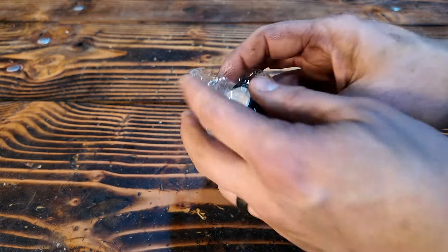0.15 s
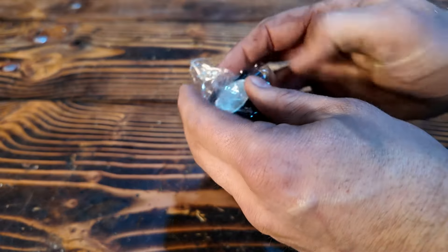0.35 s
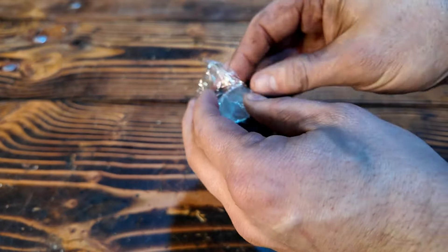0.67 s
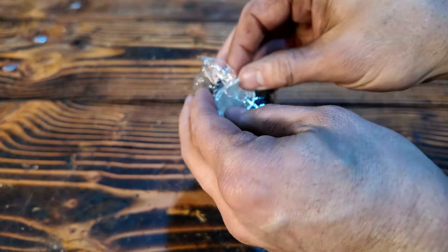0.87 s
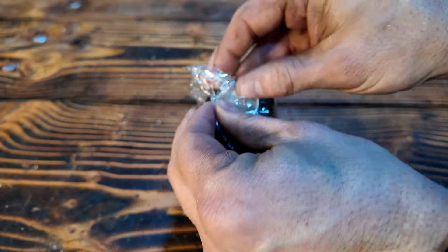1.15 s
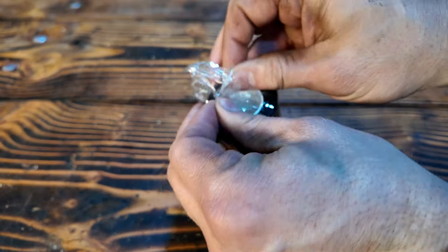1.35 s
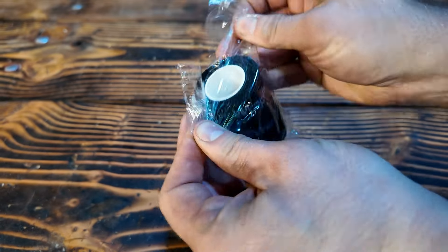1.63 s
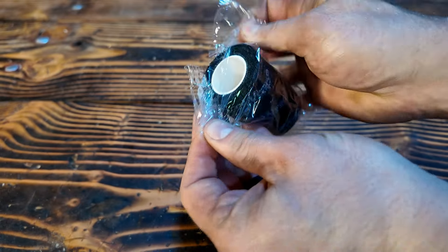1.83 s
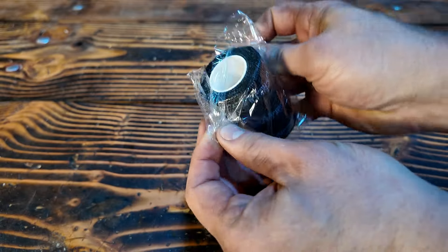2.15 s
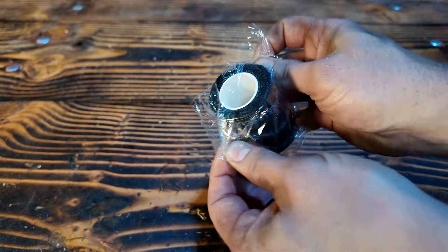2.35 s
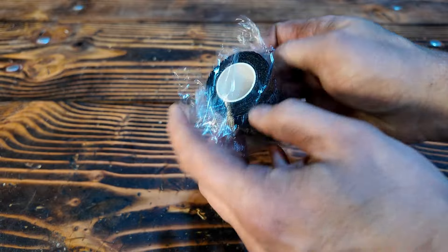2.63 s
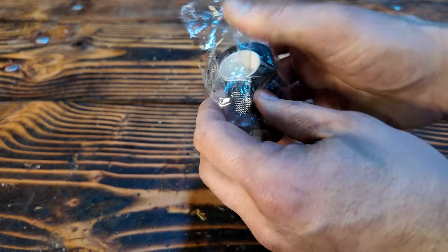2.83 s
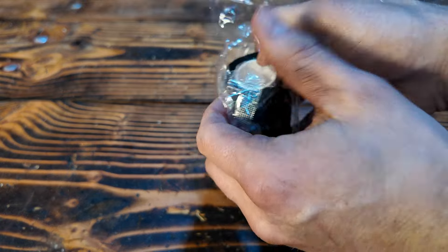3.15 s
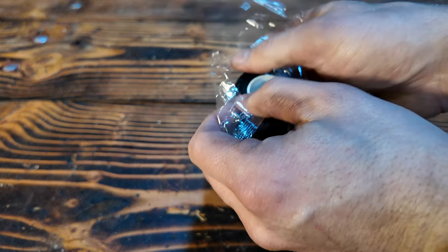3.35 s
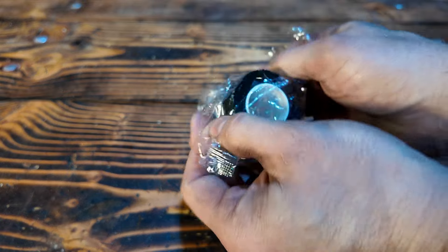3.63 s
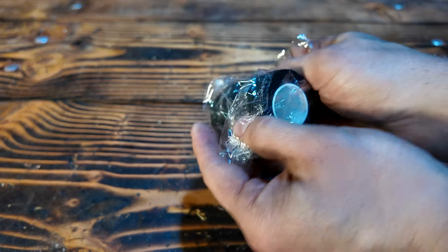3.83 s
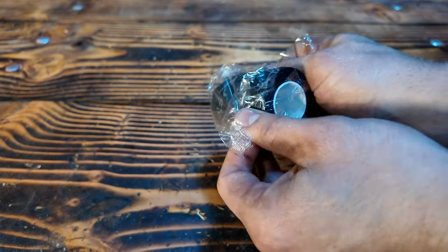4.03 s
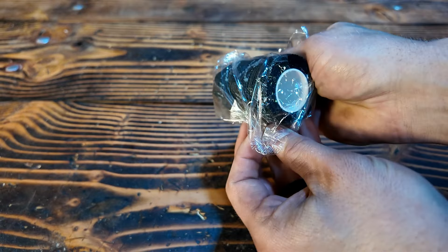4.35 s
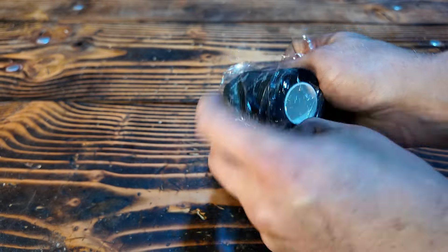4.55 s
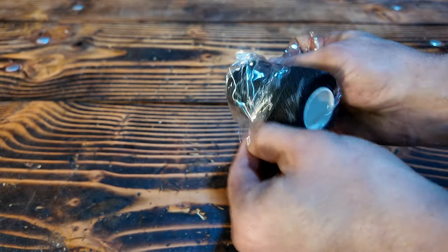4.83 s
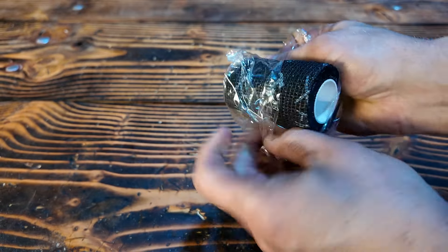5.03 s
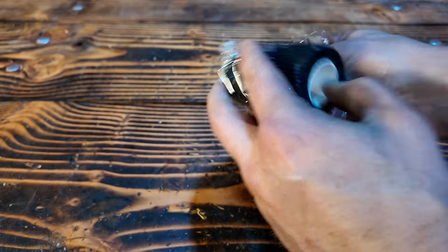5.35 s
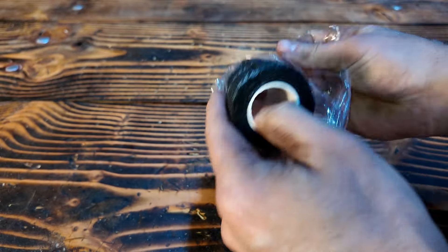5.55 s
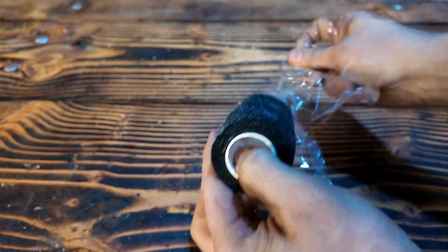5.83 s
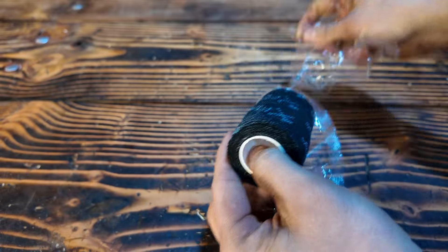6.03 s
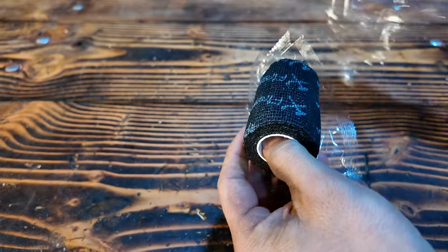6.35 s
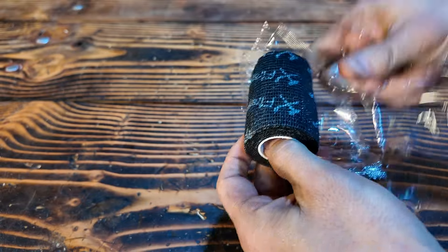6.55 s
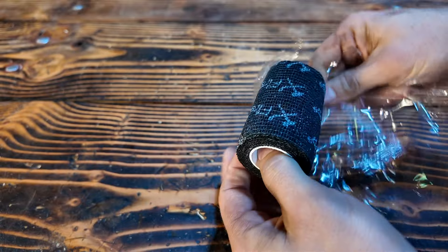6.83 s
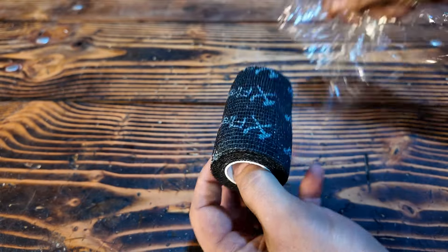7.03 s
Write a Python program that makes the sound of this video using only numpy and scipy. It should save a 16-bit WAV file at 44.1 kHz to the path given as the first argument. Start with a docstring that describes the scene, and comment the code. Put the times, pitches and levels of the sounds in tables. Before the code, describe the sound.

Bright, dry cellophane noise dominates: millisecond snaps, fine creases ticking and smooth film-on-film rustle, arriving in uneven clumps as fingers tug. Soft, hollow rubbing on the roll accompanies some pulls. Activity peaks briefly early on, continues in small bursts, swells again late, then thins out. It is heard close by in stereo, with very short indoor reflections and a faint low rumble, mains hum and hiss.

```python
"""In a quiet room, over a wooden table, hands peel and crumple a thin plastic wrapper.
Creases buckle with millisecond snaps, each ringing a facet of its own, in clumps as the fingers pull.
Film sliding on film adds a smooth rustle coloured by an air pocket; fingers rub the roll as filtered noise.
Short feedback delays answer as the room; filtered noise and a wavering sine give a low ventilation
rumble, a thin hiss and a mains hum beneath."""
import sys
import numpy as np
from scipy import signal
from scipy.fft import rfft, irfft
from scipy.io import wavfile
from scipy.ndimage import uniform_filter1d

SR = 44100
rng = np.random.default_rng(int(sys.argv[2]) if len(sys.argv) > 2 else 0)


def waveform_to_disk(signal):
    """Save audio, clipped to [-1, 1], as 16-bit WAV at the path in sys.argv[1]."""
    frames = np.transpose(np.atleast_2d(signal))
    scaled = np.clip(frames, -1, 1) * 32767
    samples = np.round(scaled).astype(np.int16)
    wavfile.write(sys.argv[1], SR, samples)


def how_loud(loudness_db):
    """Turn decibels into a plain amplitude multiplier (0 dB gives 1, 20 dB gives 10)."""
    steps = np.asarray(loudness_db, float) / 20
    return 10 ** steps


N = 316715


def rms_one(x):
    """Normalization: scales a signal to unit root mean square."""
    return x / np.sqrt(np.mean(x ** 2) + 1e-20)


def in_time(rows):
    """Linear interpolation: draws each column after t/s as a curve over all samples."""
    s, *columns = np.transpose(rows)
    return [np.interp(np.arange(N) / SR, s, column) for column in columns]


def coloured(x, points):
    """Spectral shaping: applies gain/dB by f/Hz, linear between points on a log frequency axis."""
    f, gain_db = np.transpose(points)
    hz = np.maximum(np.arange(N // 2 + 1) * SR / N, 1)
    gain = how_loud(np.interp(np.log(hz), np.log(f), gain_db))
    return irfft(rfft(x) * gain, N)


def drift(rate_hz):
    """Low-passed chance: noise through a double pole at rate_hz, of unit rms."""
    r = np.exp(-40 * np.pi * rate_hz / SR)   # computed on every 20th sample
    noise = rng.standard_normal(N // 20 + 2002)
    slow = signal.lfilter([1], [1, -2 * r, r * r], noise)[2000:]
    return np.interp(np.arange(N) / 20, np.arange(len(slow)), rms_one(slow - slow.mean()))


def ring(x, hz, t60):
    """Damped resonance: a two-pole mode that a unit click sets ringing near height 1."""
    r = how_loud(-60 / (t60 * SR))
    w = 2 * np.pi * min(hz, .45 * SR) / SR
    return signal.lfilter([np.sin(w)], [1, -2 * r * np.cos(w), r * r], x + 1e-18)


def dying(clicks, tau_s):
    """Exponential decay: an envelope that jumps at each click and dies away."""
    return signal.lfilter([1], [1, -np.exp(-1 / (tau_s * SR))], clicks)


def small(x, hz):
    """Radiation efficiency: small facets radiate little below their own range."""
    return signal.sosfilt(signal.butter(2, hz, "high", fs=SR, output="sos"), x)


def near_pocket(hz, pocket_hz):
    """Resonant selection: air between film, roll and hands favours folds near its pitch."""
    width_octaves = .25
    return np.exp(-.5 * (np.log2(hz / pocket_hz) / width_octaves) ** 2)


def gestures(rows, rise_db_per_s, fall_db_per_s):
    """Power envelope: each gesture rises, holds for its length and falls, on every 40th sample."""
    start, length, level_db = np.transpose(rows)[:3, :, None]
    t = np.arange(0, N + 40, 40) / SR
    before = np.maximum(start - t, 0)
    after = np.maximum(t - start - length, 0)
    return how_loud(level_db - rise_db_per_s * before - fall_db_per_s * after) ** 2


def unfold(coarse):
    """Linear interpolation: from every 40th sample to every sample."""
    return np.interp(np.arange(N) / 40, np.arange(len(coarse)), coarse)


# Facet sizes: lowest f/Hz, highest f/Hz, buckles/s before clumping, cycles of ring to -60 dB,
# size spread/dB per unit of an exponential draw
LARGE_FOLDS = (777, 2760, 350, 8.7, 6.6)
MIDDLE_FACETS = (2970, 5410, 650, 7.3, 3.4)
FINE_CREASES = (6830, 17600, 600, 1.96, 2.8)
# Fine creases: t/s, level/dB over the crackle
FINE_LEVEL = [(0.0, 4), (0.8, 2), (1.3, 3.5), (1.6, 1.5), (2.2, 1), (2.6, 1), (3.3, 2), (4.0, 3.5),
              (4.9, 3), (5.15, 3), (5.7, 2.5), (6.2, -3), (6.7, 0.5), (6.93, -1.5), (7.02, 3), (7.18, 0)]
# How the film radiates over the table: f/Hz, gain/dB
FILM_RADIATION = [(500, -1.5), (900, -1), (1500, -4.5), (2200, -2.5), (2900, -4), (3700, -1), (5000, -0.5),
                  (6500, 0), (10000, 1), (15000, -4)]


def film_sound():
    """Superposition: snaps, rustle and three sizes of crackle radiate from one film, as (mid, side)."""
    crackle_db, large_db, pocket_hz = handling()
    fine_db, = in_time(FINE_LEVEL)
    shared = rng.random(N), np.minimum(rng.exponential(1, N), 4.0)
    # a harder pull buckles more creases, more evenly
    effort = np.clip((crackle_db + 48) / 22, 0, 1)
    unevenness_db = 4.8 * drift(25) + 4.3 * drift(90)
    clumps = how_loud(-4.0 + 17.0 * effort + (1 - 0.79 * effort) * unevenness_db)
    middle = crackle(MIDDLE_FACETS, shared, clumps, pocket_hz)
    large = how_loud(large_db) * crackle(LARGE_FOLDS, shared, clumps, pocket_hz)
    fine = how_loud(fine_db) * crackle(FINE_CREASES, shared, clumps, pocket_hz)
    rustle = slide(crackle_db + 0.33 * large_db, effort, pocket_hz)
    film = snaps(pocket_hz) + rustle + how_loud(crackle_db) * (middle + large + fine)
    no_bass = signal.butter(4, 560, "high", fs=SR, output="sos")   # small facets radiate no bass
    return signal.sosfilt(no_bass, coloured(film, FILM_RADIATION))


# Tugs of the fingers on the film: start t/s, length t/s, crackle level/dB,
# large folds level/dB over the crackle, air pocket f/Hz
TUGS = [(0.0, 0.016, -44, 4.5, 1500), (0.102, 0.014, -38.5, 3.5, 1370), (0.245, 0.026, -36.5, 0, 1980),
        (0.303, 0.047, -38, -16, 2200), (0.43, 0.078, -42.5, -2, 1980), (0.578, 0.089, -39, 1.5, 1160),
        (0.707, 0.022, -44.5, -2, 1300), (0.735, 0.041, -50, -4, 1500), (0.812, 0.07, -46.5, 2.5, 1510),
        (0.946, 0.12, -45, -2.5, 2180), (1.082, 0.065, -37.5, 2, 2000), (1.191, 0.054, -42.5, 3, 1660),
        (1.271, 0.087, -40.5, 4, 1670), (1.46, 0.062, -25.5, -5.5, 1950), (1.56, 0.032, -40, -17, 900),
        (1.6, .03, -33.5, -23, 1200), (1.63, 0.042, -28.5, -10.5, 860), (1.706, 0.03, -39, -10, 900),
        (1.771, 0.021, -37, -4.5, 1490), (1.826, 0.066, -38, 0.5, 2010), (1.94, 0.05, -37.5, -2.5, 1840),
        (2.024, 0.064, -36.5, -3.5, 1900), (2.126, .08, -38.5, -4.5, 1790), (2.222, 0.04, -35.5, 1, 1770),
        (2.341, .054, -41, -24, 1800), (2.402, 0.0086, -42.5, 1, 2250), (2.472, 0.12, -38, -4, 2080),
        (2.544, 0.1, -40, -9, 1760), (2.713, 0.059, -35.5, -9, 1890), (2.768, 0.17, -42, -1, 1740),
        (2.981, .11, -38, -8.5, 1620), (3.088, 0.095, -39.5, -12, 2100), (3.323, 0.12, -40.5, -6.5, 1660),
        (3.472, 0.072, -40, -5, 1680), (3.581, 0.087, -36.5, -8, 1250), (3.815, 0.17, -38.5, -2, 1720),
        (4.032, 0.092, -33.5, -8, 1630), (4.157, 0.099, -34, -1, 1850), (4.281, 0.2, -38.5, -7.5, 2200),
        (4.491, 0.16, -36.5, -6, 2200), (4.693, 0.18, -34, -5.5, 1780), (4.89, 0.071, -37, -2.5, 1850),
        (5.113, 0.069, -34, -4, 2020), (5.246, 0.061, -36.5, 0, 2030), (5.376, 0.19, -38, -1, 1820),
        (5.64, .08, -38, 1.5, 1580), (5.721, 0.17, -32, -2.5, 1600), (5.891, 0.093, -36, 0.5, 1830),
        (6.045, 0.032, -35.5, 2, 1510), (6.091, 0.11, -31, -1, 1540), (6.253, 0.081, -53, 3, 2400),
        (6.341, .2, -44, -2.5, 2430), (6.665, 0.13, -43, 2.5, 2200), (6.811, 0.068, -38, -1, 1820),
        (6.923, 0.027, -39.5, 1, 1760), (6.98, 0.15, -49, -4, 2300)]
# The film settling by itself between tugs: t/s, crackle level/dB
SETTLING = [(0.0, -44), (0.7, -46.5), (0.9, -52.5), (1.4, -41), (1.9, -50.5), (2.3, -48), (3.25, -48),
            (3.75, -39), (4.0, -54), (4.5, -60), (5.05, -43), (5.6, -40.5), (6.25, -44), (6.6, -52),
            (6.8, -48.5), (7.0, -51), (7.18, -67)]


def handling():
    """Power-weighted mean: the strongest tug leads crackle dB, large folds dB over it and pocket Hz."""
    settling_large_db, settling_pocket_hz = -6, 2200
    tugs = gestures(TUGS, rise_db_per_s=1498, fall_db_per_s=295)
    settling_db, = in_time(SETTLING)
    large_db, pocket_hz = np.transpose(TUGS)[3:]
    rest = how_loud(settling_db) ** 2
    total = rest + unfold(tugs.sum(0))
    large = rest * how_loud(settling_large_db) ** 2 + unfold(how_loud(large_db) ** 2 @ tugs)
    pocket = (rest * settling_pocket_hz + unfold(pocket_hz @ tugs)) / total
    return 10 * np.log10(total), 10 * np.log10(large / total), pocket


def crackle(facets, shared, clumps, pocket_hz, count=8):
    """Random buckling: short bursts of slip each ring one facet size, as (mid, side)."""
    low_hz, high_hz, per_s, cycles, spread_db = facets
    burst_s, evened_s = 0.00065, 0.019
    pocket_lift_db, wander_db = 13, 3.5
    chance, size = shared   # one buckle shakes facets of all sizes together
    born = (chance < per_s * clumps / SR) * how_loud(spread_db * size)
    slip = rng.standard_normal((2, N))
    slip[1] += drift(12.7) * slip[0]   # the buckling spot wanders left and right
    dealt = rng.integers(0, count, N)
    out = 0
    for k, hz in enumerate(np.geomspace(low_hz, high_hz, count)):
        # the mix of facet sizes keeps changing
        share = how_loud(pocket_lift_db * near_pocket(hz, pocket_hz) + wander_db * drift(1.9))
        burst = slip * dying(born * share * (dealt == k), burst_s)
        out = out + small(ring(burst, hz, cycles / hz), hz / 2) / np.sqrt(cycles / hz)
    # steady pull: the mean level follows the hands
    power = uniform_filter1d(out[0] ** 2, int(evened_s * SR))
    return out / np.sqrt(0.5 * np.mean(power) + power)


# Loud single snaps: t/s, facet peak level/dB before the film's radiation, facet f/Hz,
# low pop level/dB over that peak
SNAPS = [(0.101, -23, 8600, -6), (0.1608, -19, 6020, -1), (0.2418, -17.5, 8400, -30),
         (0.2489, -16.5, 2080, -26), (0.303, -28, 4330, -22), (0.3176, -17.5, 7210, -26),
         (0.336, -14.5, 3400, -29), (0.3606, -15, 3700, -36), (0.397, -27, 3810, -22),
         (0.436, -18.5, 4530, -37), (0.5416, -23, 3720, -23), (0.6342, -16, 4340, -28),
         (0.7102, -23, 12300, -5.5), (0.8024, -28, 2450, -29), (0.9396, -35, 12300, -23),
         (1.0859, -17, 4050, -26), (1.116, -24, 2000, -17), (1.1887, -26.5, 4820, 3.5),
         (1.2431, -13.5, 5300, -1.5), (1.3071, -17, 9700, -30), (1.3963, -14.5, 9190, -39),
         (1.4616, -30, 3290, -22), (1.602, -16, 4000, -28), (1.6264, -13, 3950, -23),
         (1.682, -9, 4660, -33), (1.7105, -12, 4710, -11), (1.7384, -17.5, 4530, -22),
         (1.7627, -14.5, 7000, -35), (1.8292, -24, 2100, -24), (1.897, -27, 7020, -18),
         (1.947, -22, 6240, -20), (2.0348, -28, 3970, 4), (2.0767, -17.5, 4230, -9),
         (2.137, -21, 5000, -26), (2.181, -24, 4610, -28), (2.2345, -21, 1820, -12),
         (2.3028, -23, 5350, -30), (2.3477, -15, 4100, -37), (2.3764, -17.5, 5400, -38),
         (2.4573, -26, 3750, -20), (2.4778, -27, 3100, -21), (2.7052, -15.5, 4020, -25),
         (2.8747, -31, 4940, -15), (2.9843, -27, 3750, -26), (3.066, -34, 4260, -15),
         (3.0968, -17, 5670, -6), (3.1567, -32, 5560, -26), (3.1802, -26, 6840, -30),
         (3.199, -21.5, 6900, -18), (3.5014, -25, 3900, -25), (3.5853, -17, 3510, -0.5),
         (3.714, -23, 11200, -22), (3.768, -29, 4800, -36), (3.8198, -16, 6000, -4),
         (3.8553, -17.5, 6870, -4), (3.8921, -24.5, 2250, -15), (3.905, -18, 4130, -15),
         (3.926, -19, 1920, -6), (3.9485, -19, 5300, -18), (4.0364, -14.5, 4500, -22),
         (4.1709, -25, 3090, -13), (4.2058, -15.5, 4000, -22), (4.2246, -14, 3430, -25),
         (4.2817, -22, 1800, -10), (4.3067, -18.5, 4840, -29), (4.3398, -15, 9700, -6.5),
         (4.3944, -22, 5040, -19), (4.42, -19, 4590, -17), (4.4423, -23, 2230, -9),
         (4.6394, -28, 3920, -18), (4.6876, -14.5, 6150, -30), (4.7167, -18.5, 4950, -24),
         (4.781, -14, 4550, -11), (4.81, -17, 4860, -7), (4.838, -12, 12100, -30), (4.978, -18, 6030, -29),
         (5.005, -23.5, 5310, 0), (5.0447, -12.5, 5900, -45), (5.1043, -25, 6330, -31),
         (5.117, -19.5, 10400, -14), (5.245, -22, 5530, -9), (5.6221, -36, 5200, -42),
         (5.8294, -10.5, 1800, -23), (5.8895, -14, 3970, -27), (6.0242, -13.5, 4500, -13),
         (6.0588, -23, 1960, -11), (6.081, -19, 4560, -8), (6.1145, -14.5, 4290, 1),
         (6.1793, -12, 4190, -28), (6.3988, -23, 5650, -25), (6.448, -25.5, 2470, -27),
         (6.6732, -25.5, 4530, -12), (6.721, -25, 2190, -12), (6.76, -27, 2660, -21),
         (6.8384, -16.5, 1740, -16), (6.9084, -23, 4870, -9)]


def snaps(pocket_hz):
    """Snap-through instability: a ragged run of ticks excites sharp edges, a facet and an air-pocket pop."""
    burst_s, after_db, length = 0.00035, -4.0, 600   # length in samples
    out = np.zeros((2, N + length))
    for s, peak_db, hz, pop_db in SNAPS:
        slip = rng.standard_normal((2, length))
        lags, sizes = rng.uniform(0, 1, (2, 3))
        ticks = np.zeros(length)
        ticks[(lags * .006 * SR).astype(int)] = how_loud(after_db) * sizes   # three later ticks within 6 ms
        ticks[0] = 1
        burst = slip * dying(ticks, burst_s)
        at = round(s * SR)
        facet = small(ring(burst, hz, 6 / hz), hz / 2)
        pop = ring(burst, pocket_hz[at], 6 / pocket_hz[at])
        edge = np.diff(burst, prepend=0) / 2
        sound = facet / np.abs(facet[0]).max() + how_loud(pop_db) * pop / np.abs(pop[0]).max() + edge
        out[:, at:at + length] += how_loud(peak_db) * sound
    return out[:, :N]


# Film sliding on film: f/Hz, spectral level/dB
SLIDE = [(500, -44), (1000, 0.5), (2300, 4), (5000, -2), (9000, -9), (15000, -7.5)]


def slide(crackle_db, effort, pocket_hz):
    """Friction noise: a rustle coloured by the air pocket grows faster than the crackle as the pull hardens."""
    light_db, hard_db, pocket_db = -14.0, -2.5, -6.0
    rustle = coloured(rng.standard_normal((2, N)), SLIDE)
    air = rng.standard_normal((2, N))
    pocket = 0
    for hz in np.geomspace(*LARGE_FOLDS[:2], num=8):
        mode = small(ring(air, hz, 8.9 / hz), hz / 2) / np.sqrt(hz)
        pocket = pocket + near_pocket(hz, pocket_hz) * mode
    both = rustle / np.std(rustle) + how_loud(pocket_db) * pocket / np.std(pocket)
    return how_loud(crackle_db + light_db + (hard_db - light_db) * effort + 2.0 * drift(27)) * both


# Fingers rubbing on the roll: start t/s, length t/s, hollow part level/dB, deep part level/dB over it
RUBS = [(0.0, 0.014, -52, -20), (0.25, 0.096, -49, -7), (1.465, .075, -43.5, -12),
        (1.523, 0.054, -42.5, -8), (1.638, 0.12, -57, -7), (2.714, 0.16, -53, -5.5), (2.99, 0.17, -54, -9),
        (3.436, 0.12, -55, -3.5), (3.826, 0.032, -51.5, -10), (4.042, 0.19, -51, -7),
        (4.595, 0.19, -57, -6), (5.112, 0.49, -59.5, -5.5), (5.745, 0.18, -48.5, -4.5),
        (6.09, 0.12, -51.5, 2.5), (6.797, 0.14, -56, -3.5)]
# The hollow core of the roll: f/Hz, spectral level/dB
RUB_CORE = [(250, -33), (400, -6.5), (480, 2.5), (580, 1.5), (800, 0), (1500, -37), (5000, -70)]
# Hand and table: f/Hz, spectral level/dB
RUB_DEEP = [(100, -20), (170, -1.5), (260, 0.0), (340, -2.5), (600, -25), (2000, -70)]


def rubbing():
    """Skin friction: drag on the roll excites a hollow rumple and a deeper part, as (mid, side)."""
    rest_db = -67
    strokes = gestures(RUBS, rise_db_per_s=800.0, fall_db_per_s=300.0)
    out = 0
    for colour, over_db in (RUB_CORE, np.zeros(len(RUBS))), (RUB_DEEP, np.transpose(RUBS)[3]):
        noise = coloured(rng.standard_normal((2, N)), colour)
        power = how_loud(rest_db) ** 2 + unfold(how_loud(over_db) ** 2 @ strokes)
        out = out + np.sqrt(power) * noise / np.std(noise)
    return out * how_loud(2.37 * drift(59))


# Stereo width: f/Hz, gain/dB on the side signal
WIDTH = [(60, -44), (150, -20), (380, -10.5), (950, -12.5), (2380, -16), (5980, -9), (15000, -3.5)]
# Where the film is held: t/s, left over right level/dB
SWAY = [(0.0, 1), (0.5, 0), (5.26, 0.5), (6.28, 0), (6.4, -1), (7.18, -1.5)]


def stereo(mid, side, film_mid):
    """Interchannel phase and level difference: turns mid and side into left and right."""
    # the sound reaches one microphone a little earlier, now left, now right
    quadrature = signal.hilbert(film_mid).imag
    side = coloured(0.82 * side + 0.59 * drift(3.2) * quadrature, WIDTH)
    lean = how_loud(in_time(SWAY)[0] / 2)
    return np.array([(mid + side) * lean, (mid - side) / lean])


def room(x):
    """Recirculating reflections: six feedback delays a side, duller on every round."""
    t60_s, wall_cut_hz, level_db = .12, 7000, -22   # t60 at the lowest frequencies
    out = np.zeros((2, N))
    dull = np.exp(-2 * np.pi * wall_cut_hz / SR)
    for k, lag in enumerate((rng.uniform(0.0066, 0.015, 12) * SR).astype(int)):
        loop, state = x.copy(), [0.]
        gain = how_loud(-60 * lag / SR / t60_s)
        for i in range(lag, N, lag):
            back, state = signal.lfilter([gain * (1 - dull)], [1, -dull], loop[i - lag:i], zi=state)
            loop[i:i + lag] += back[:N - i]
        out[k % 2] += (loop - x) * (-1) ** (k // 2)
    return how_loud(level_db) * out


# Ventilation rumble: f/Hz, spectral level/dB
RUMBLE = [(18, -44), (30, -39), (58, 2), (108, 3.5), (137, 2.5), (377, -25.5), (700, -39.5), (910, -44),
          (1540, -120)]


def background():
    """Stationary noise and a tone: ventilation rumble, wavering mains hum, thin hiss, as (mid, side)."""
    rumble = coloured(rng.standard_normal((2, N)), RUMBLE)
    rumble = how_loud(-54 - 0.86 * drift(5.3)) * rumble / np.std(rumble)
    hum_hz, hum_db = 119.5, -60 + 3 * drift(1.4)
    phase_wander = .6 * drift(2.9)   # radians
    hum = how_loud(hum_db) * np.sin(2 * np.pi * hum_hz * np.arange(N) / SR + phase_wander)
    hiss = coloured(rng.standard_normal((2, N)), [(300, -12), (900, 8.5), (5000, 5.0), (15000, -2)])
    return rumble + hum + how_loud(-63) * hiss


def scene():
    """Linear superposition: film, rubbing and background sum; the room answers the film."""
    film = film_sound()
    mid, side = film + rubbing() + background()
    return stereo(mid, side, film[0]) + room(film[0])


def roll_off(x):
    """The treble ends steeply here."""
    return signal.sosfilt(signal.butter(12, 16820, fs=SR, output="sos"), x)


def record(dry):
    """Band limitation: the microphones drop the deepest bass and the top."""
    cut = signal.sosfilt(signal.butter(4, 48, "high", fs=SR, output="sos"), dry)
    cut = signal.sosfilt(signal.cheby2(10, 50, 16600, fs=SR, output="sos"), cut)
    return roll_off(cut)


dry = scene()
out = record(dry)
waveform_to_disk(out)
```